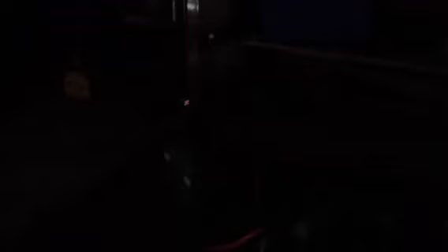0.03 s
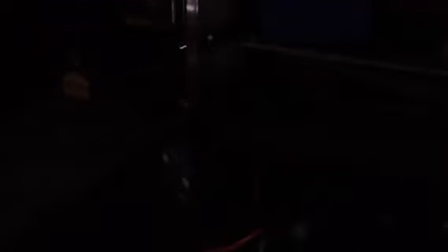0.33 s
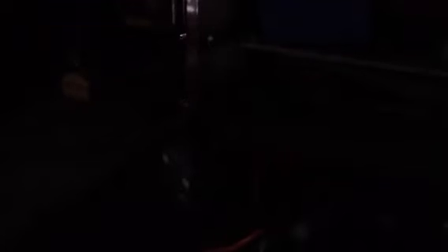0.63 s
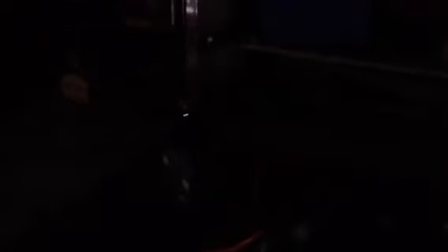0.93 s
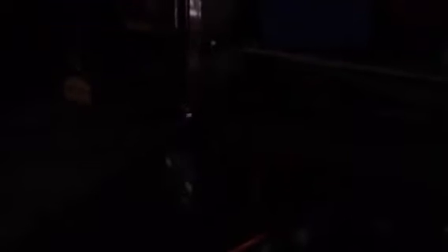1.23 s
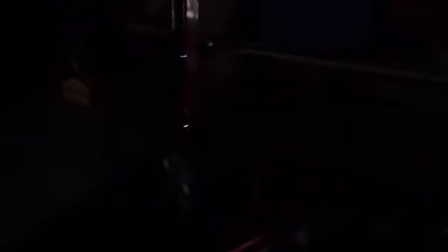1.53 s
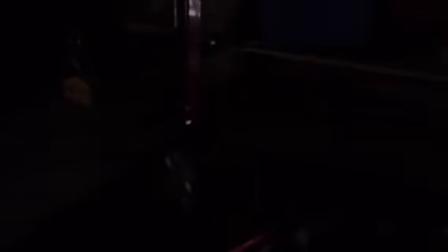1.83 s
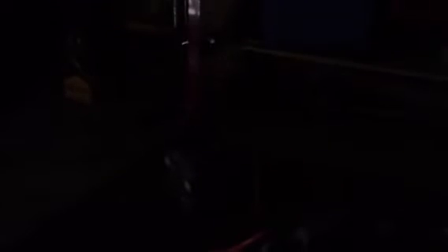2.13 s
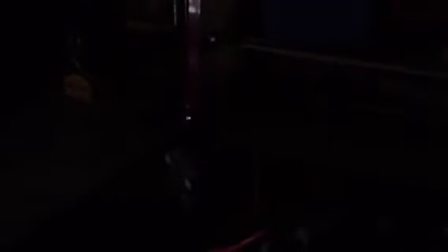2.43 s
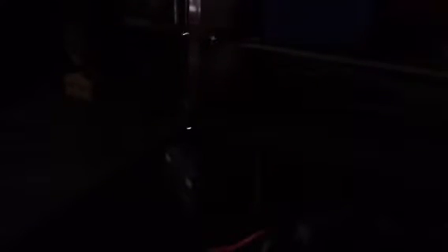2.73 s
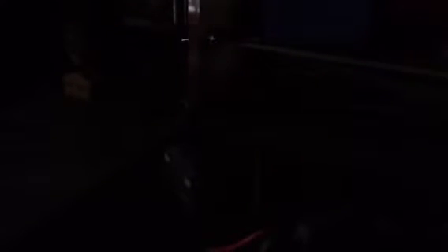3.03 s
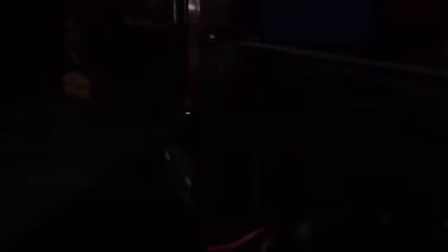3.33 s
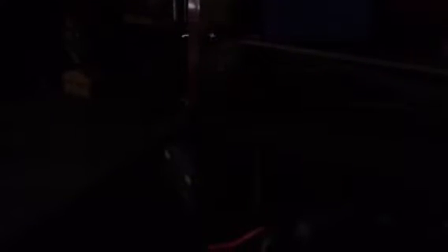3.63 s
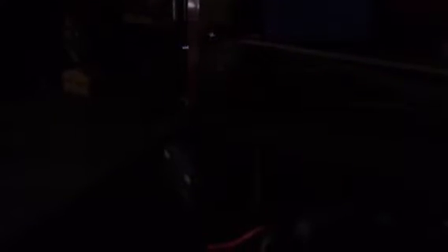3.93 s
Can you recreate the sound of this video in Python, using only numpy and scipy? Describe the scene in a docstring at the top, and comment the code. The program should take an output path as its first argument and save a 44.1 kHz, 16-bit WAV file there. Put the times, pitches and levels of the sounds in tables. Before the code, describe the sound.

Harsh buzzing of a high-voltage spark jumping along a rod, over a faint low hum.

```python
"""Spark buzz in a workshop

One microphone in a small workshop, within earshot of an upright rod where a high-voltage spark fires
about 77 times a second: a harsh, bright buzz. The spark jumps between the rod's upper and lower end;
each end has its own colour and echoes, which shift as the spark slides along between jumps.
Underneath, the apparatus hums and a low drone wavers over the room's rumble. The sound cuts in abruptly.
"""
import sys
import numpy as np
from scipy import signal
from scipy.fft import rfft, irfft
from scipy.io import wavfile

SR = 44100
rng = np.random.default_rng(int(sys.argv[2]) if len(sys.argv) > 2 else 0)


def pcm_store(signal):
    """Save signal as 16-bit PCM."""
    levels = np.round(np.clip(np.atleast_2d(signal), -1, 1) * 32767)
    wavfile.write(sys.argv[1], SR, levels.astype(np.int16).T)


N = 176400
SPARK_HZ = 77.475
UPPER, LOWER = 0, 1  # ends of the rod

# spells at the upper end, the rest being at the lower: from t/s, to t/s, extra level/dB
UPPER_SPELLS = [(.123, .161, -0.5), (.174, .213, -1), (.226, .471, -1), (.484, .755, 0.5),
                (.846, .872, 2.1), (1.143, 1.156, -3.5), (1.362, 1.388, -5.5), (1.426, 1.44, -8),
                (1.491, 1.504, -1), (1.53, 1.604, 0.5), (1.617, 1.736, 2), (2.098, 2.304, 3),
                (2.472, 2.485, -2.5), (2.743, 2.782, 0), (2.846, 2.859, 1.5), (2.937, 3.143, 2),
                (3.44, 3.853, 2.5), (3.905, 4.01, .5)]
# strength of the discharge: t/s, relative level/dB
DISCHARGE_LEVEL = [(.12, -3), (.22, -0.5), (.4, 1.5), (.53, 0), (.72, 0), (.78, -2), (.9, -1.6), (1.06, -1),
                   (1.22, -2.5), (1.35, -3.5), (1.46, -3), (1.7, -4), (1.8, -3), (2.02, -1.5), (2.12, -5),
                   (2.28, -4.5), (2.4, -2.5), (2.58, -5), (2.7, -2.5), (2.87, -3), (2.96, -2.7),
                   (3.13, -2.5), (3.2, -3), (3.35, -1.5), (3.5, -4), (3.7, -3.5), (3.77, -5.5),
                   (3.81, -2.5), (3.84, -2), (3.87, -3.5), (4, -2)]
# single sparks that snap harder: t/s, extra level/dB
HARD_SNAPS = [(.193, 3.5), (.232, 4.5), (1.149, 6), (1.368, 12), (1.381, 11.5), (1.394, 2), (1.432, 10),
              (1.497, 2.5), (1.536, 1), (2.014, 3), (2.04, 2), (2.079, 4.5), (2.092, 3.5), (2.477, 6.5),
              (2.749, 5), (2.852, 2), (3.91, 3.5)]
# colour of a spark at each end: f/Hz, relative level/dB
UPPER_COLOUR = [(100, -48), (310, -46), (387, -10), (465, -14), (542, -2), (620, -8), (700, -13.5),
                (852, -9), (930, -12.5), (1005, -3), (1160, -2.5), (1240, -4.5), (1472, -6), (1550, 2.3),
                (1705, -2.5), (1782, 1.5), (1860, -4.5), (2092, -1.3), (2170, -9), (2247, 3), (2400, -1.5),
                (2710, 0.1), (3100, -2), (3500, -5.5), (4000, -4.5), (4185, -2.5), (4380, -4.3), (4700, -2),
                (5700, 0.25), (7000, 0.5), (7900, 4.5), (9200, 8.5), (10200, 9), (11500, 5), (13300, 0),
                (15300, -5)]
LOWER_COLOUR = [(100, -58), (310, -17), (387, -23.5), (465, -9.5), (542, -4), (620, -3), (700, -6),
                (852, -13), (930, -4), (1085, -10.5), (1170, -2), (1400, 1), (1705, -7.5), (1860, -2),
                (2015, -5.5), (2170, 1.5), (2247, -9.5), (2480, -1.5), (2635, -8.5), (2790, -2), (3150, -1),
                (3450, -9), (4100, -1.5), (4450, -5.5), (4700, -3), (5400, -1.5), (6400, 0.2), (7000, 0.5),
                (8000, 6), (9200, 8.5), (10200, 9), (11500, 4.5), (13300, 0), (15300, -2.5)]
# echoes off nearby surfaces: delay/ms, gain, growth of the delay as the spark slides/(ms/s)
UPPER_ECHOES = [(.217, .23, 0), (1.33, .62, .38), (2.42, .12, .3)]
LOWER_ECHOES = [(.213, .19, 0), (.73, .42, .8), (2.5, .08, .3)]
# colour of the room's answer against the direct sound: f/Hz, relative level/dB
ROOM_COLOUR = [(200, -12), (700, -7.5), (1500, -2), (4000, 4.5), (9000, 2.3), (15000, 1.5)]
# resonances rung by every spark: f/Hz, width/Hz, upper-end boost/dB, lower-end boost/dB
RESONANCES = [(3180, 60, 4, 4.5), (4380, 110, 8, 0), (5730, 110, 3, 3), (7516, 80, 3, 3), (9230, 160, 2, 5)]
# hum of the apparatus: multiple of the spark rate, level/dB
HUM_PARTIALS = [(2, -66), (3, -70), (4, -58.5), (8, -59.5)]
# swell of the drone: t/s, level/dB
DRONE_LEVEL = [(.12, -70), (.5, -66), (.65, -60), (.8, -68.5), (1.8, -65), (2.05, -59), (2.42, -57.5),
               (2.55, -62.5), (4, -63)]
# colour of the room's rumble: f/Hz, relative level/dB
RUMBLE_COLOUR = [(25, -21), (50, -22), (100, -7), (140, -7), (180, -2), (235, 6.5), (275, -2.5),
                 (400, -9.5), (1000, -3.5), (4000, -24)]
# swell of the rumble: t/s, level/dB
RUMBLE_LEVEL = [(.1, -57), (.55, -59), (.66, -51), (.78, -58), (1.2, -59.5), (2.1, -58), (4, -59)]


def amp(db):
    """Decibels to gain."""
    return 10 ** (np.asarray(db) / 20)


def unit(x):
    """Scales to rms 1."""
    return x / np.sqrt(np.mean(x ** 2) + 1e-20)


def curve(points, t):
    """Reads a table at the given times."""
    return np.interp(t, *np.transpose(points))


def spectrum(points, hz):
    """Reads a dB spectrum as gain."""
    f, db = np.transpose(points)
    return amp(np.interp(np.log(hz + 1), np.log(f), db))


def colour(x, points, size=4096):
    """Minimum-phase filter with the given spectrum, so clicks stay sharp."""
    log_gain = np.log(spectrum(points, abs(np.fft.fftfreq(size, 1 / SR))))
    response = np.exp(np.conj(signal.hilbert(log_gain)))
    taps = np.fft.ifft(response).real[:size // 2]
    return signal.oaconvolve(x, taps)[:len(x)]


def wander(t, hz, count=16):
    """Slow random motion of rms about 1, up to the given rate."""
    rates = np.geomspace(hz / 10, hz, count)[:, None]
    return np.sin(2 * np.pi * (rates * t + rng.random((count, 1)))).sum(0) * np.sqrt(2 / count)


def clicks(times, gains, size=8):
    """The bare discharges: one band-limited click at each exact time."""
    samples = np.floor(times * SR).astype(int)[:, None] + np.arange(1 - size, size + 1)
    offset = samples - times[:, None] * SR
    pulses = gains[:, None] * np.sinc(offset) * np.cos(np.pi * offset / (2 * size)) ** 2
    return np.bincount(np.maximum(samples, 0).ravel(), pulses.ravel(), N)[:N]


def room_tail(early_t60_s=.1, late_t60_s=.36, late_db=-5):
    """The workshop's answer to a click: dense early reflections and a weaker, longer ring."""
    t = np.arange(SR // 2) / SR
    fade = amp(-60 * t / early_t60_s) + amp(late_db - 60 * t / late_t60_s)
    reflections = rng.standard_normal(len(t)) * (rng.random(len(t)) < .2)
    tail = reflections * fade * np.minimum(t / .00027, 1)
    return tail / np.linalg.norm(tail)


def ring(x, end):
    """Narrow resonances ring with each spark, as strongly as the struck end excites them."""
    for hz, width, *boost_db in RESONANCES:
        band = signal.lfilter(*signal.iirpeak(hz, hz / width, SR), x)
        x = x + (amp(boost_db[end]) - 1) * band
    return x


def rod_end(end, times, gains, crack, spell, age, echoes, tone, slide_ms_per_s, room_db):
    """One end at the microphone: as the spark slides, its echoes lag and the colour sweeps down."""
    def arrivals(ms_per_s):
        """Slightly unsteady arrival times along a path whose delay grows at the given rate."""
        jump_ms = .018 * rng.standard_normal(len(times))[spell]
        jitter_ms = .0055 * rng.standard_normal(len(times))
        creep_ms = .007 * wander(times, hz=3.5)
        return times + (jitter_ms + creep_ms + jump_ms + ms_per_s * age) / 1000

    near = clicks(arrivals(-slide_ms_per_s), gains * crack)  # the direct path shortens
    for delay_ms, gain, growth in echoes:
        near += clicks(arrivals(growth - slide_ms_per_s) + delay_ms / 1000, gain * gains * crack)
    # six paths through the room, whose shares drift slowly and sizzle from spark to spark
    path_rates = np.linspace(-1, 1, 6) * slide_ms_per_s
    shares = np.array([1 + .7 * wander(times, hz=4) + .42 * rng.standard_normal(len(times))
                       for _ in path_rates])
    shares /= np.linalg.norm(shares, axis=0)
    shares *= amp(-5 * age)  # the room answers 5 dB less per second of sliding
    room = sum(signal.oaconvolve(clicks(arrivals(rate), gains * share), room_tail())[:N]
               for rate, share in zip(path_rates, shares))
    at_microphone = near + amp(room_db) * colour(room, ROOM_COLOUR)
    sound = ring(colour(at_microphone, tone), end)
    return unit(sound) * np.sqrt(np.mean(gains ** 2))


def sparks(trim_db=-23, snap_dry_share=.7, lower_lag_s=.00019):
    """A regular train of high-voltage sparks, each striking the upper or the lower end of the rod."""
    times = np.arange(.01259, N / SR, 1 / SPARK_HZ)
    snap_db = sum(extra_db * (abs(times - at) < .5 / SPARK_HZ) for at, extra_db in HARD_SNAPS)
    level_db = curve(DISCHARGE_LEVEL, times) + trim_db + (1 - snap_dry_share) * snap_db
    scatter_db = .02 * rng.standard_normal(len(times))
    flutter_db = .52 * wander(times, hz=8.2)
    crack = amp(snap_dry_share * snap_db + scatter_db + flutter_db)  # direct sound and near echoes only
    at_upper = np.zeros(len(times), bool)
    for start, stop, extra_db in UPPER_SPELLS:
        inside = (times >= start) & (times < stop)
        at_upper |= inside
        level_db += extra_db * inside
    spell = np.cumsum(at_upper != np.roll(at_upper, 1))  # counts the jumps
    age = times - times[np.searchsorted(spell, spell)]  # seconds since the last jump
    upper = rod_end(UPPER, times, amp(level_db) * at_upper, crack, spell, age,
                    UPPER_ECHOES, UPPER_COLOUR, slide_ms_per_s=.1, room_db=.6)
    lower = rod_end(LOWER, times + lower_lag_s, amp(level_db) * ~at_upper, crack, spell, age,
                    LOWER_ECHOES, LOWER_COLOUR, slide_ms_per_s=.28, room_db=2.2)
    return upper + lower


def hum(t):
    """The apparatus hums in steady low tones locked to the spark rate."""
    return sum(amp(db) * np.sqrt(2) * np.sin(2 * np.pi * (multiple * SPARK_HZ * t + rng.random()))
               for multiple, db in HUM_PARTIALS)


def drone(t, centre_hz=141.4, waver_hz=3.7, throb_db=3):
    """A faint low tone that wavers in pitch and throbs in level."""
    pitch = centre_hz + waver_hz * wander(t, hz=14)
    tone = np.sqrt(2) * np.sin(2 * np.pi * np.cumsum(pitch) / SR)
    level_db = curve(DRONE_LEVEL, t) + throb_db * wander(t, hz=14)
    return amp(level_db) * tone


def rumble(t):
    """Room tone of the workshop: low noise that swells briefly."""
    shape = spectrum(RUMBLE_COLOUR, np.fft.rfftfreq(N, 1 / SR))
    noise = irfft(rfft(rng.standard_normal(N)) * shape, N)
    return amp(curve(RUMBLE_LEVEL, t)) * unit(noise)


def scene():
    """Sparks up front, with hum, drone and rumble beneath, at one microphone."""
    t = np.arange(N) / SR
    return (sparks() + hum(t) + drone(t) + rumble(t))[None]


def record(dry):
    """The microphone's signal cuts in abruptly, its top treble steeply rolled off."""
    start_s, cutoff_hz = .12, 15400
    live = dry * (np.arange(N) >= start_s * SR)
    lowpass = signal.firwin(401, cutoff_hz, window=("kaiser", 8), fs=SR)
    return signal.oaconvolve(live, lowpass[None], "same")


dry = scene()
out = record(dry)
pcm_store(out)
```